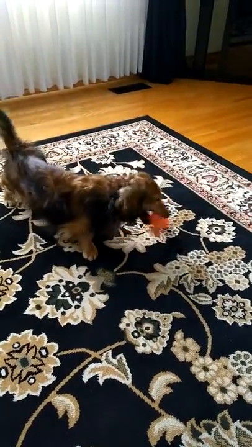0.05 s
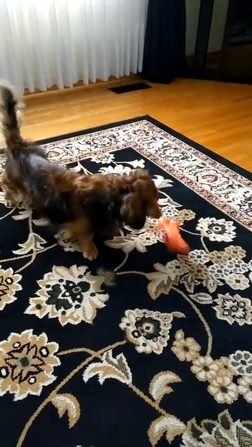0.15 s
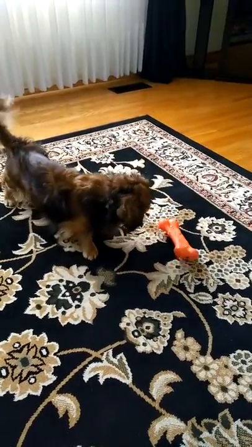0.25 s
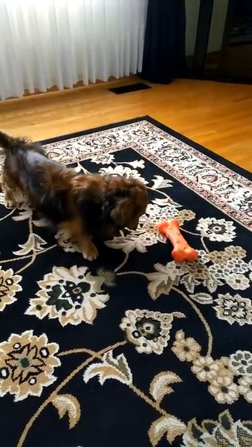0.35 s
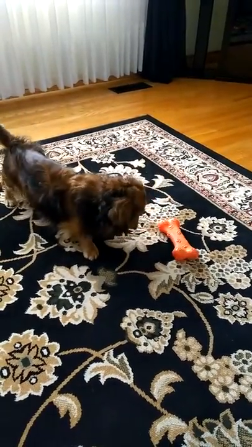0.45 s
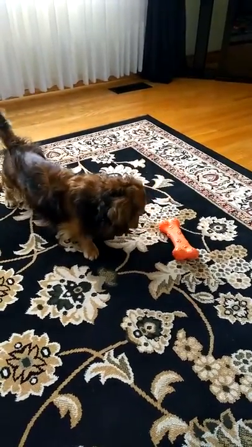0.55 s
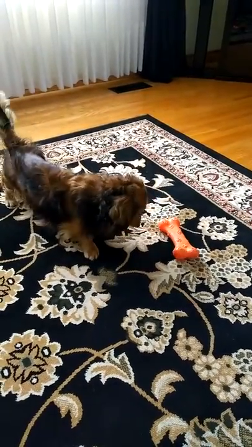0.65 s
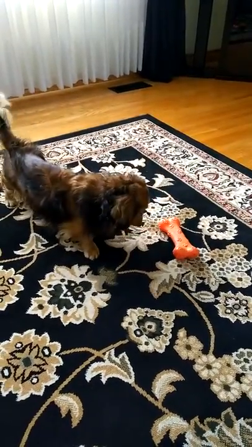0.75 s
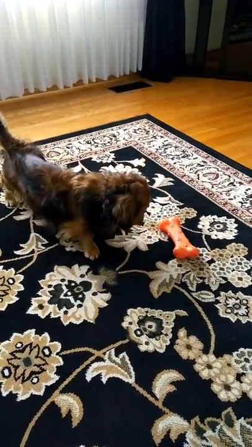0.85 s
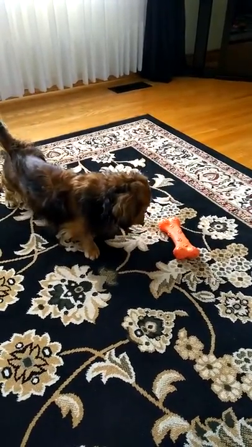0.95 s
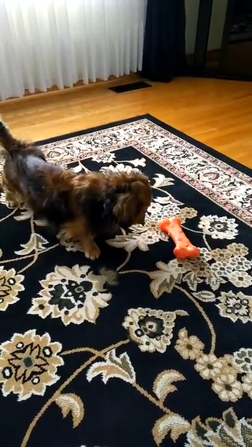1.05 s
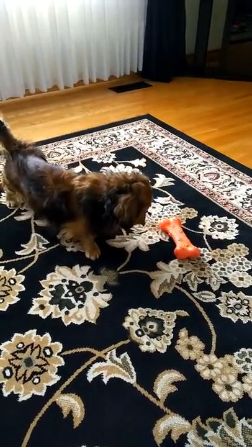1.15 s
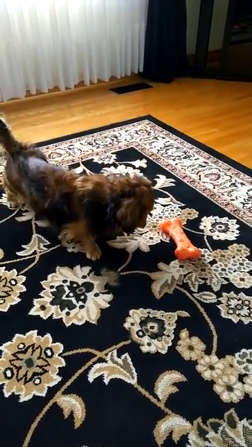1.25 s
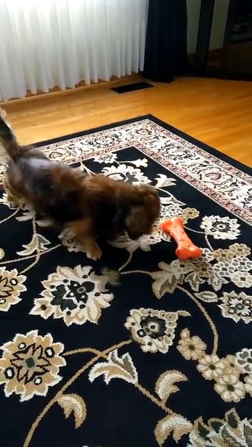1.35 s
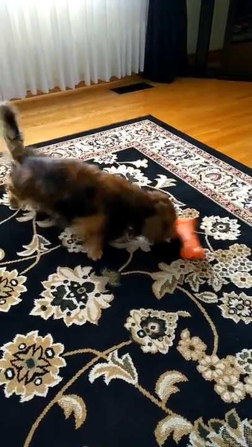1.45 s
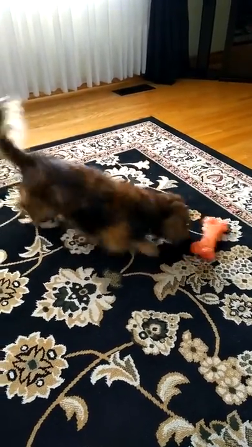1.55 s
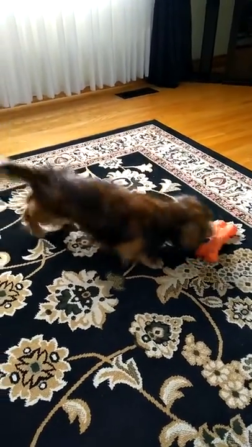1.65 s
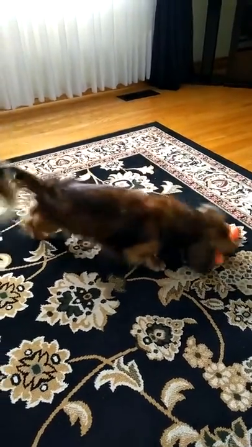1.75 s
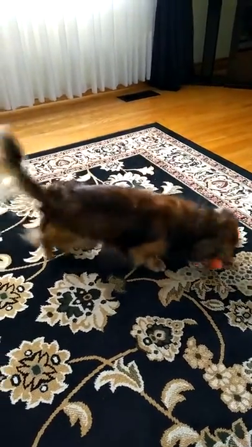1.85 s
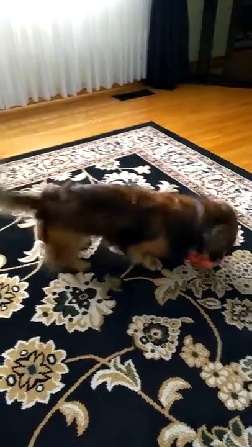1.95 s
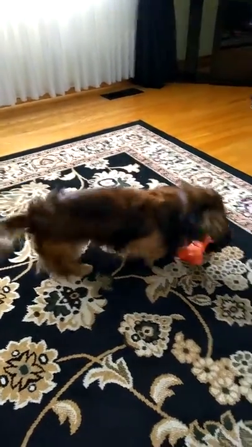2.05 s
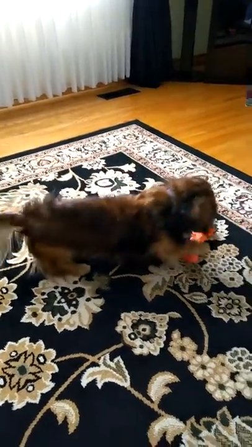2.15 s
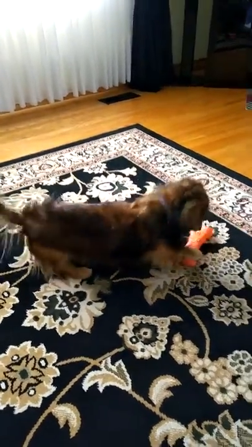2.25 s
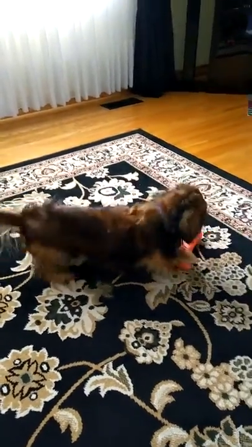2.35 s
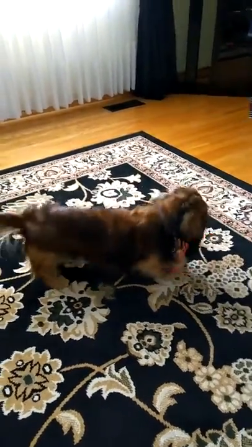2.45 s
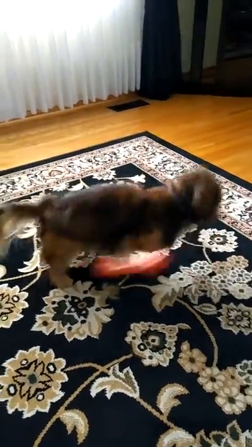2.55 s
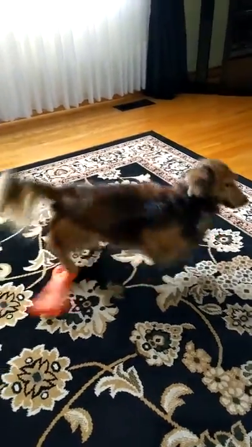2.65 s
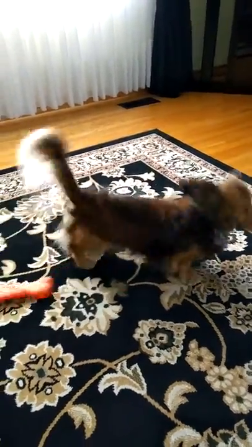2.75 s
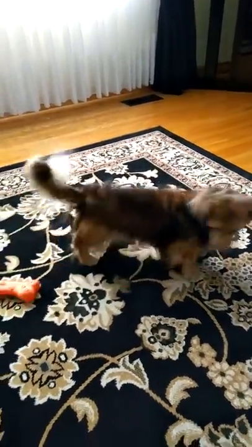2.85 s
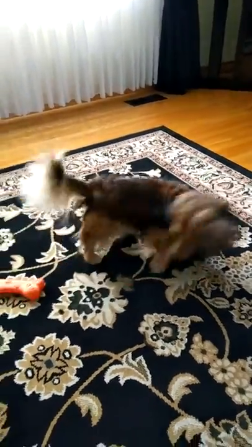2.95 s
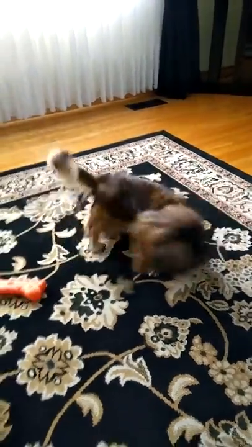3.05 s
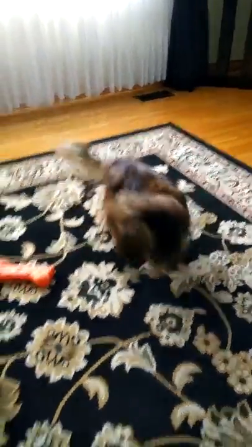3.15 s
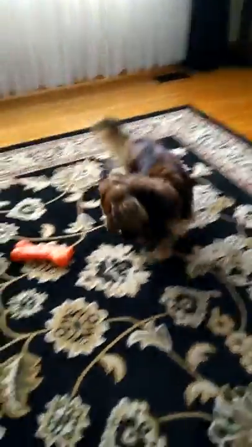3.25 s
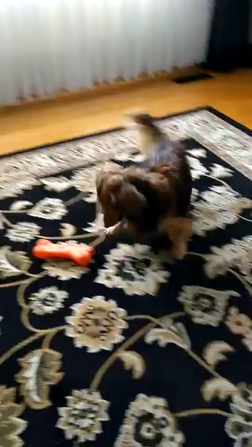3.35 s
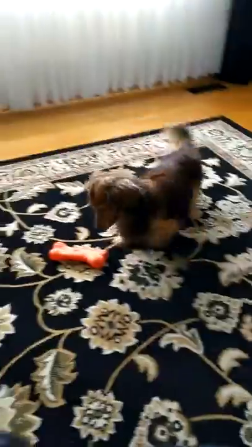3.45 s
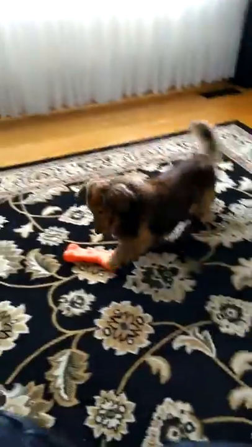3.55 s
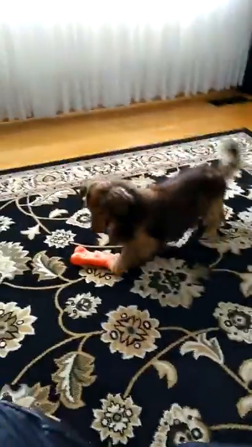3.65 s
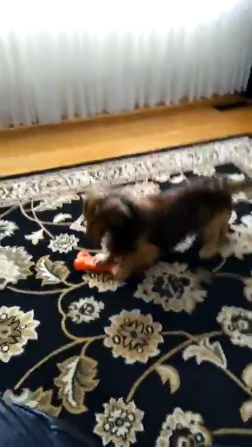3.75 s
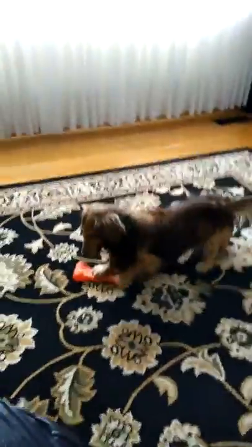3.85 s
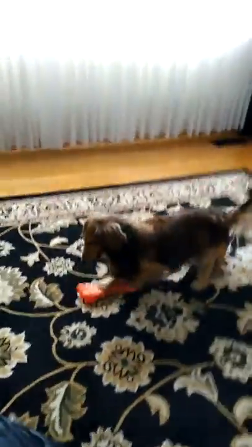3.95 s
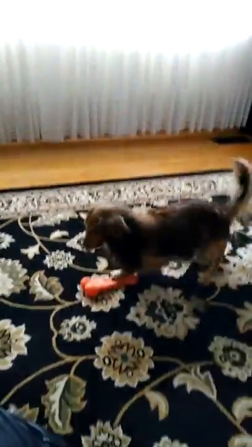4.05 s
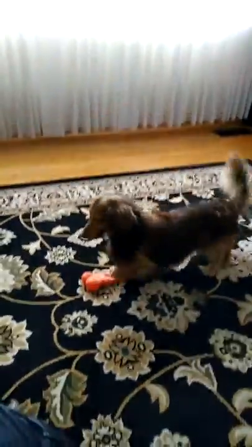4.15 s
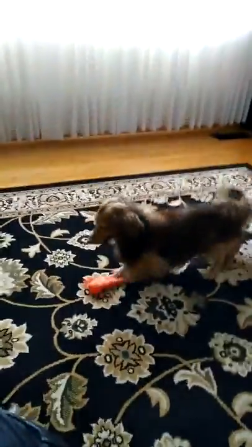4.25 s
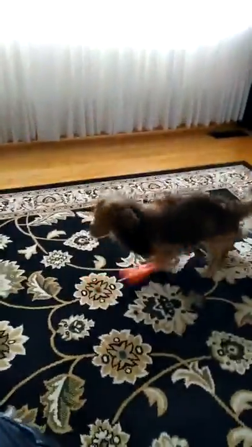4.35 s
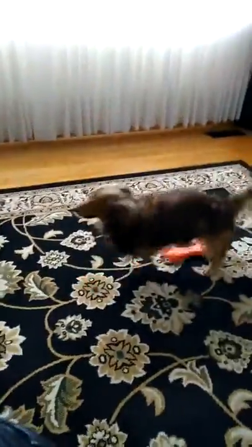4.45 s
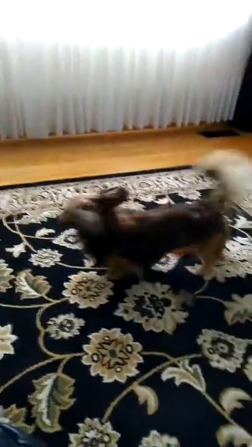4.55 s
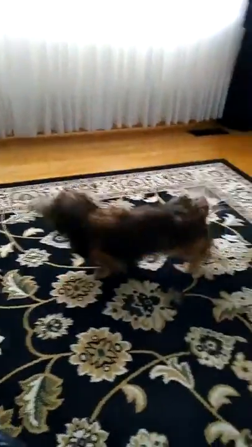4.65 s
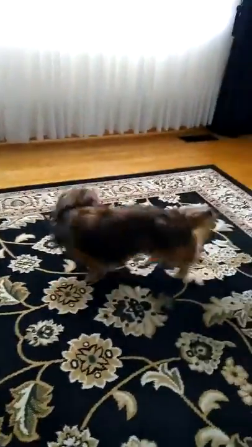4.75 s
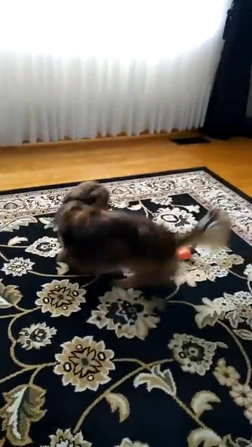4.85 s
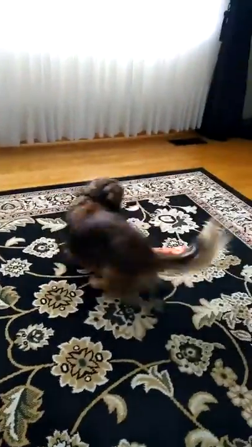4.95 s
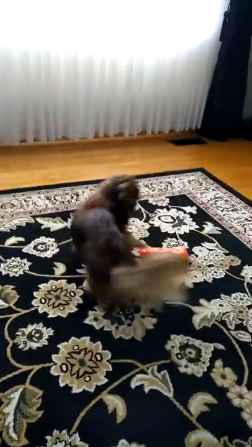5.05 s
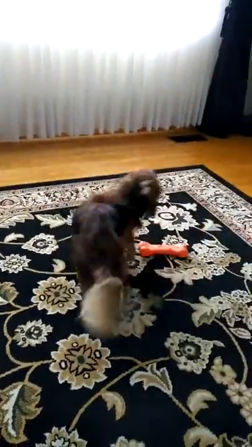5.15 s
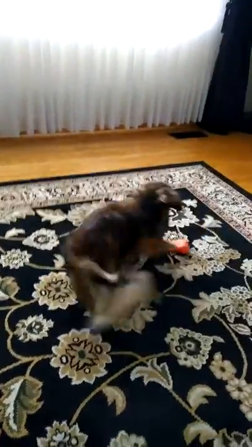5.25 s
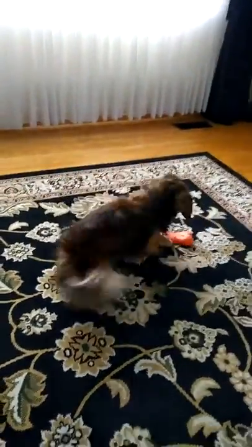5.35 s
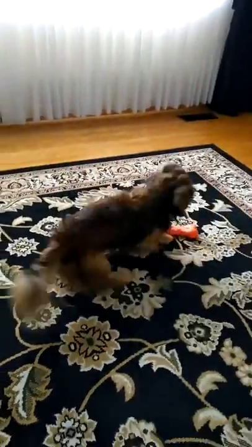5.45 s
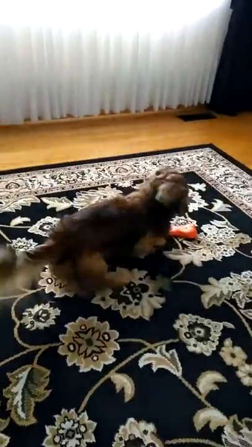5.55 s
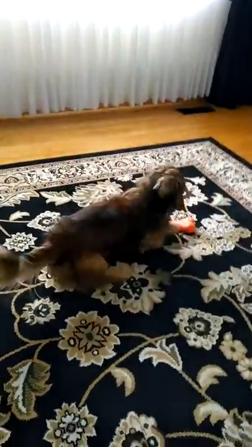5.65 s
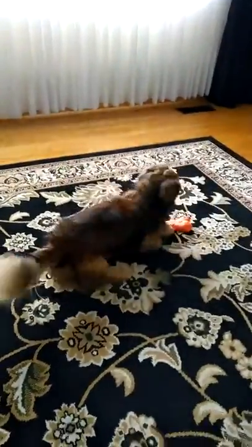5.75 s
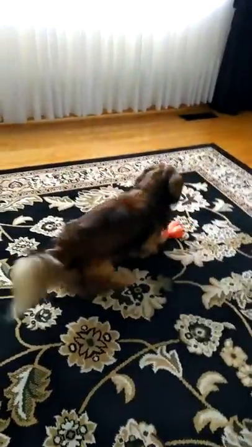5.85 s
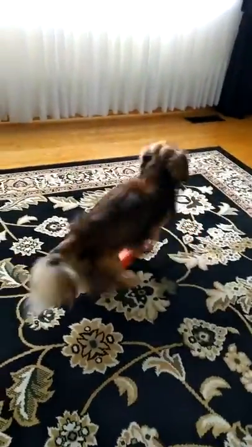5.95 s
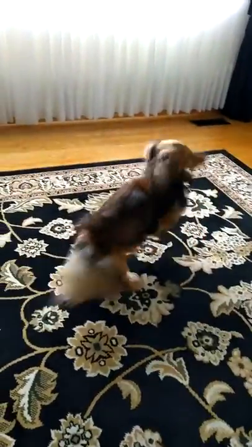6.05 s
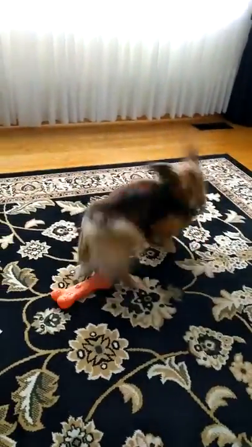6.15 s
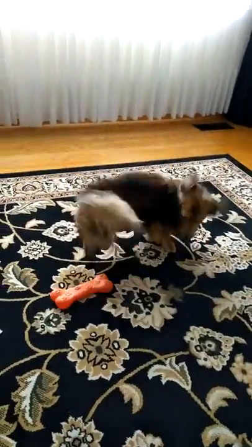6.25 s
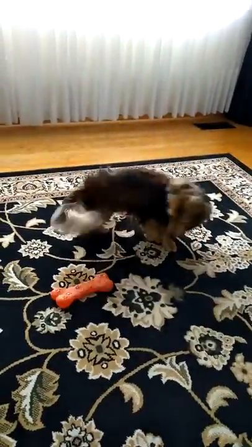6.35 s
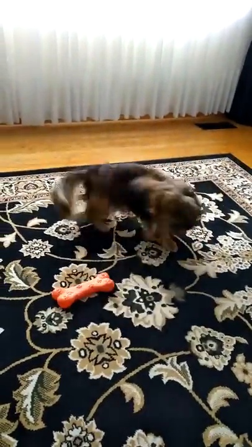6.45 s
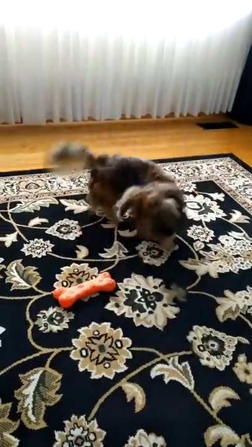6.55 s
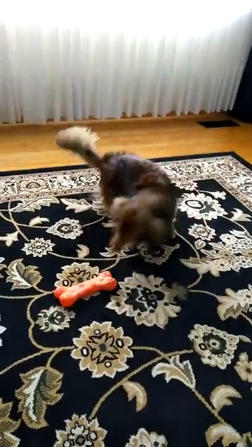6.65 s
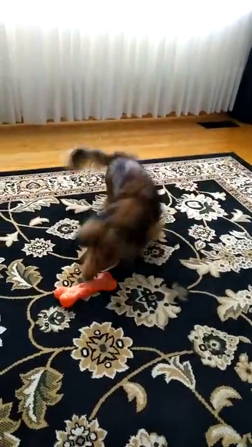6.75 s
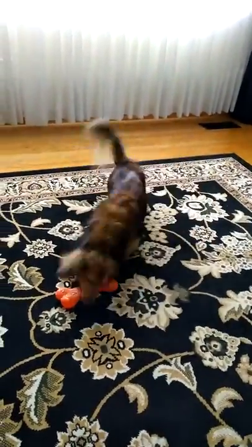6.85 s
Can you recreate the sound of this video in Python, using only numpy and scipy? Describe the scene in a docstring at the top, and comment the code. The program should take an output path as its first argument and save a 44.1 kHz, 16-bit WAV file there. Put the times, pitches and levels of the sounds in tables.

```python
"""A hollow rubber toy squeaks as a small dog bites and slams it on a rug over a wooden living-room floor.
Air driven through its reed makes a harmonic tone whose pitch sags with the pressure; refilling makes a hiss.
Landings of paws and toy excite damped board modes and a knock; teeth and claws click as short noise bursts.
A collar tag rings in high modes, fur and paws brush the rug as shaped noise, and the room adds its tail."""
import sys
import numpy as np
from scipy import signal
from scipy.fft import rfft, irfft
from scipy.io import wavfile

SR = 44100
rng = np.random.default_rng(int(sys.argv[2]) if len(sys.argv) > 2 else 0)


def put_to_file(sound):
    """Save the sound as 16-bit audio at rate SR, in the file named by the first command-line argument."""
    columns = np.atleast_2d(sound).T  # one column per channel
    safe = np.clip(columns, -1, 1)
    whole_steps = np.round(safe * 32767)
    wavfile.write(sys.argv[1], SR, whole_steps.astype(np.int16))


N = 303849
TIME = np.arange(N) / SR

# Bites on the toy: start t/s, build-up/s, time to empty/s, release t/s, top pitch f/Hz, sag/share,
# top level/dB (relative), start below top/dB, fade/dB, fundamental/dB, outer overtones/dB, air leak/dB
BITES = [ (0, 0.13, 0.25, .289, 1331, 0.097, -19, 4.5, 14, -17, 2.5, -59.5),
         (2.637, .002, .295, 2.925, 1350, 0.11, -20.5, 4, 12, -8.5, -2, -40.5),
         (4.457, .026, .43, 4.91, 1375, .108, -21.5, 4, 12, -7, -0.5, -39.5),
         (6.015, 0.019, 0.34, 6.39, 1354, 0.097, -21.5, 15.5, 10, -10, -2, -34.5)]
# Sudden blows on the toy: start t/s, time to empty/s, release t/s, pitch f/Hz, pitch drop/share,
# hold of the pitch (power), level/dB (relative), fade/dB, air leak/dB
BLOWS = [ (2.541, .049, 2.59, 1038, 0.38, 2.2, -22.5, 28, -8),
         (3.875, .081, 3.975, 998, .24, 3.4, -30, 9.5, -19)]
# Colour of the reed in its short plastic tube when squeezed: f/Hz, level/dB
SQUEEZED_REED = [(1000, -6.5), (1330, -5), (2000, -16), (2700, -23.5), (4000, -22.5), (5300, -21.5),
                 (6600, -16.5), (7300, 2.5), (8000, 3), (9300, 0.5), (10600, -10), (12500, -22.5),
                 (16000, -24.5)]
# Colour of the same reed when slammed: f/Hz, level/dB
SLAMMED_REED = [(750, -7.5), (1000, -12), (2000, -14.5), (3000, -20), (4000, -21), (5000, -11.5),
                (6000, -9.5), (7000, 2), (8000, 1), (9000, -4.5), (10500, -12.5), (13000, -23.5),
                (16000, -37)]
# Air drawn back through the silent reed: peak t/s, level/dB, rise/s, fall/s
REFILLS = [(.8, -67, .16, 0.24), (2.29, -66.5, 0.027, 0.16), (3.25, -60, 0.49, 0.48), (4.01, -66, .06, 0.8),
           (5.3, -70.5, 0.51, 0.203), (5.63, -60, 0.081, 0.12), (5.9, -64, 0.19, 0.27),
           (6.9, -66.5, 0.15, .2)]
# Colour of air rushing through the squeaker: f/Hz, relative density/dB per Hz
AIR_COLOUR = [(400, -30.5), (1500, -20), (3000, -16), (4500, -12), (5700, -12), (7300, -1), (8100, -3),
              (8900, -2), (10500, -11), (13000, -17), (16000, -25)]
# Landings of paws and toy at set times: t/s, level/dB (relative), knock relative to that/dB
LANDINGS = [(.281, -31.5, -20), (1.506, -56, 0.5), (1.678, -45, -23), (1.7894, -58, 9.5),
            (2.257, -50, -3.5), (2.498, -52, 6), (2.599, -50.5, 10), (3.128, -60, 8), (3.513, -47.5, -18),
            (3.823, -62, 16.5), (4.004, -62.5, 16), (4.052, -46.5, 4), (4.293, -51, 2.5), (4.389, -57, 9),
            (4.436, -55, 10), (4.628, -47.5, -26), (5.213, -40, -13), (5.276, -55.5, 3), (5.355, -58.5, 6),
            (5.568, -54.5, 10.5), (5.96, -59, 11), (6.0, -64, 15), (6.113, -47.5, -3), (6.43, -48.5, -29),
            (6.819, -55, -22)]
# Modes of the floorboards under the rug: f/Hz (before detuning), level/dB (mean), t60/s
BOARD_MODES = [(62, -14.5, 0.33), (91, -4, 0.084), (117, 0.5, 0.11), (144.3, -2, 0.26), (171, -7.5, 0.11),
               (215.7, -8, 0.17), (255, -29, 0.028)]
# Colour of the knock's rattle: f/Hz, relative density/dB per Hz
KNOCK_COLOUR = [(40, -49), (150, -10.5), (300, 11), (450, -3), (700, -5), (1300, -19.5), (3000, -22),
                (15000, -61)]
# Teeth and claws on the rubber: t/s, level/dB (relative)
CLICK_TIMES = [(2.257, -40), (2.4959, -35.5), (2.6325, -35), (3.8192, -34.5), (3.835, -35), (4.051, -39.5),
               (4.074, -37), (4.182, -42.5), (4.252, -40), (4.297, -39), (4.438, -35), (5.26, -40),
               (5.351, -34), (5.36, -40), (5.517, -44.5), (5.571, -37.5), (5.601, -38.5), (5.737, -39),
               (5.922, -44), (6.322, -41)]
# Colour of a click: f/Hz, relative density/dB per Hz
CLICK_COLOUR = [(400, -7.5), (1500, 1.5), (3000, -2.5), (5000, -0.5), (8500, 5.5), (11000, -3),
                (16000, -18.5)]
# Collar tag touching its ring: t/s, level/dB (relative)
TAG_TOUCHES = [(2.0084, -46.5), (2.054, -57), (2.064, -46), (2.145, -53), (5.095, -46), (5.62, -40.5)]
# Modes of the tag: f/Hz (before detuning), level/dB (mean), t60/s
TAG_MODES = [(6430, -16.5, 0.035), (7350, 5, 0.14), (8600, -3.5, 0.067), (10200, 6, 0.054),
             (10970, -1, 0.06), (12350, -5, .035), (13800, -5, 0.044)]
# Lunges and turns brushing the rug: peak t/s, level/dB, rise/s, fall/s
SHUFFLES = [(1.66, -70, 0.067, 0.073), (1.95, -74.5, 0.1, 0.22), (2.6, -59, .1, 0.2),
            (3.38, -66, 0.46, 0.49), (4.43, -65.5, 0.34, 0.33), (5.35, -65.5, 0.12, 0.4),
            (6.0, -57.5, .08, 0.12)]
# Colour of rubbing on the rug: f/Hz, relative density/dB per Hz
RUG_COLOUR = [(25, -35), (60, -5), (110, -3.5), (350, -5), (550, -11.5), (2000, -19), (6000, -23.5),
              (9000, -39.5), (16000, -64)]
# Colour of the still room: f/Hz, relative density/dB per Hz
STILL_ROOM_COLOUR = [(15, -31.5), (30, -18), (45, -8), (60, -0.5), (85, -13), (145, -15), (360, -22.5),
                     (560, -24.5), (890, -26.5), (1500, -29.5), (2500, -30.5), (9000, -31.5),
                     (16000, -33.5)]
# Reverberation time of the room: f/Hz, t60/s
ROOM_T60 = [(100, 0.59), (400, 0.52), (1200, 0.62), (3000, 0.55), (8000, 0.41), (15000, 0.19)]
# First echoes off floor, furniture, window and ceiling: delay/s, level/dB (before its drift)
ECHOES = [(.0047, -16), (.0093, -10.5), (0.014, -9), (0.0218, -14)]

# pressure falls steadily, then collapses: further loss of pitch and level, and how abruptly
COLLAPSE_SHARE, COLLAPSE_DB, COLLAPSE_POWER = .11, 10, 6.5
RISE_HZ_PER_S = 200  # while the jaws are still closing
SLACK_POWER = 3.2  # how late in a bite the reed goes slack
BLOW_SLACK = 1  # slackness at the end of a blow
BLOW_FUNDAMENTAL_DB, BLOW_BUZZ_DB = 4.5, 1.45
EMPTY_DB_PER_S = 600  # extra decay once a blow has emptied the toy
STEPS_FROM_S, STEPS_PER_S = 2.5, 4
STEP_DB, STEP_SPREAD_DB, STEP_KNOCK_DB = -55, 4, -12
FIDGET_DB = -79.5  # constant brushing beneath the moves
STILL_ROOM_DB = -65.5
MIC_LOW_CUT_HZ, CUTOFF_HZ = 55, 15900


def from_db(db):
    """A level in decibels is twenty times the logarithm of an amplitude ratio."""
    return 10 ** (np.asarray(db) / 20)


def rms_one(x):
    """Dividing by the root mean square gives unit effective amplitude."""
    return x / np.sqrt(np.mean(x ** 2) + 1e-20)


def at_hz(points, hz):
    """A curve over frequency is interpolated on a logarithmic frequency axis."""
    known_hz, values = np.transpose(points)
    return np.interp(np.log(np.maximum(hz, 1)), np.log(known_hz), values)


def noise(spectrum, size=N):
    """Filtering white noise by a spectral envelope gives coloured noise, here of rms 1."""
    hz = np.fft.rfftfreq(size, 1 / SR)
    white = rfft(rng.standard_normal(size))
    return rms_one(irfft(white * from_db(at_hz(spectrum, hz)), size))


def drift(per_s):
    """Joining random values, per_s of them a second, gives a slow fluctuation of rms 1."""
    knots = rng.standard_normal(N // 8)
    return rms_one(np.interp(TIME * per_s, np.arange(len(knots)), knots))


def swells(rows):
    """Each gain envelope is a Gaussian with separate time constants for rise and fall."""
    gain = 0
    for s, level_db, rise_s, fall_s in rows:
        width_s = np.where(TIME < s, rise_s, fall_s)
        gain = gain + from_db(level_db) * np.exp(-((TIME - s) / width_s) ** 2)
    return gain


def add(track, s, sound):
    """Sounds superpose linearly; this one starts at time s."""
    start = max(0, round(s * SR))
    track[start:start + len(sound)] += sound[:N - start]


def burst(spectrum, rise_s, t60, size=16384):
    """Densely packed modes sound as noise that swells quickly and decays exponentially."""
    t = np.arange(size) / SR
    return noise(spectrum, size=size) * (1 - np.exp(-t / rise_s)) * from_db(-60 * t / t60)


def ring(modes, spread_db, detune, size=16384):
    """Modal excitation: each touch gives every damped mode a chance strength and shift in pitch."""
    t = np.arange(size) / SR
    hz, mode_db, t60 = np.transpose(modes)[:, :, None]
    strength_db = mode_db + spread_db * rng.standard_normal(hz.shape)
    hz = hz * (1 + detune * rng.uniform(-0.82, 1, hz.shape))
    partials = from_db(strength_db - 60 * t / t60) * np.sin(2 * np.pi * hz * t)
    return np.sum(partials, axis=0)


def reed(pitch, level_db, slack, colour, fundamental_db, buzz_db, air_db, jitter,
         waver=0.0012, mellow_db=9, slack_waver=0.0095, leak_db=13, slack_jitter=.004, dull_db=4):
    """A reed chops air into harmonic pulses; slackness (0-1) adds waver and leak and dulls the overtones."""
    size = len(pitch)
    t = np.arange(size) / SR
    fast = (jitter + slack_jitter * slack) * drift(900)[:size]
    slow = (waver + slack_waver * slack) * drift(150)[:size]
    hz = pitch * (1 + fast + slow)
    phase = 2 * np.pi * np.cumsum(hz) / SR
    orders = np.arange(1, 21)[:, None]
    outer = (orders > 1) & ((orders < 5) | (orders > 7))  # all overtones but the 5th to 7th
    partial_db = at_hz(colour, orders * hz) + fundamental_db * (orders == 1) + buzz_db * outer
    partial_db = partial_db + slack ** 2 * (mellow_db / orders - dull_db * orders / 10)
    audible = orders * hz < SR / 2
    tone = np.sum(from_db(partial_db) * audible * np.cos(orders * phase), axis=0)
    # turbulence escapes each time the reed opens
    opening = 1 + np.cos(phase)
    air = from_db(air_db + leak_db * slack) * noise(AIR_COLOUR, size=32768)[:size] * opening
    gate = np.clip(t / 0.00047, 0, 1) * np.clip((t[-1] - t) / 0.0014, 0, 1)
    return (tone + air) * from_db(level_db) * gate


def bites(tremble=0.0064):
    """Reed pitch and level follow pressure as it builds, sags and collapses, with growing unsteadiness."""
    out = np.zeros(N)
    for (s, build_s, empty_s, release_s, top_hz, sag, top_db, start_db, fade_db,
         fundamental_db, buzz_db, air_db) in BITES:
        t = np.arange(round((release_s - s) * SR)) / SR
        closing_s = np.maximum(build_s - t, 0)
        spent = np.clip((t - build_s) / empty_s, 0, 1)
        collapse = spent ** COLLAPSE_POWER
        unsteady = tremble * spent * drift(45)[:len(t)]
        pitch = top_hz * (1 - sag * spent - COLLAPSE_SHARE * collapse + unsteady)
        pitch = pitch - RISE_HZ_PER_S * closing_s
        level_db = top_db - start_db * closing_s / build_s - fade_db * spent - COLLAPSE_DB * collapse
        add(out, s, reed(pitch, level_db, spent ** SLACK_POWER, SQUEEZED_REED,
                         fundamental_db, buzz_db, air_db, jitter=0.00087))
    return out


def first_echoes(x, moving_db=2.5):
    """Early reflection: surfaces return delayed copies, whose share drifts as the dog swings the toy."""
    out = x.copy()
    for delay_s, echo_db in ECHOES:
        delayed = np.interp(TIME - delay_s, TIME, x, left=0)
        out += delayed * from_db(echo_db + moving_db * drift(25))
    return out


def room(x, wet_db, build_s=0.0059):
    """Diffuse reverberation: convolution with noise that decays at its own rate in each band."""
    t = np.arange(SR) / SR
    edges = np.geomspace(50, 18000, 13)  # Hz
    tail = 0
    for low, high in zip(edges, edges[1:]):
        band_filter = signal.butter(2, [low, high], "band", fs=SR, output="sos")
        band = signal.sosfilt(band_filter, rng.standard_normal(SR))
        tail = tail + band * from_db(-60 * t / at_hz(ROOM_T60, np.sqrt(low * high)))
    tail = rms_one(tail * (1 - np.exp(-(t / build_s) ** 2))) / np.sqrt(SR)  # unit energy
    return from_db(wet_db) * signal.fftconvolve(x, tail)[:N]


def scuffing(uneven_db=3.0):
    """Friction on the rug's pile gives coloured noise of uneven strength."""
    gain = from_db(FIDGET_DB) + swells(SHUFFLES)
    return gain * noise(RUG_COLOUR) * from_db(uneven_db * drift(35))


def still_room():
    """A steady background is stationary coloured noise."""
    return from_db(STILL_ROOM_DB) * noise(STILL_ROOM_COLOUR)


def dropped_toy(hz=1005, level_db=-54, t60=0.22):
    """A damped resonance: the hollow toy pings at the first landing, as it falls from the dog's mouth."""
    t = np.maximum(TIME - LANDINGS[0][0], 0)
    envelope = from_db(level_db - 60 * t / t60) * (1 - np.exp(-t / 0.0008))
    return envelope * np.sin(2 * np.pi * hz * t)


def thuds(cushion_s=0.0037, boom_db=-1, push_s=0.00049, push_db=-1, rattle_db=-1.0):
    """Impact excites board modes through the soft rug, with a knock made of one short push and a rattle."""
    out = np.zeros(N)
    for s, level_db, knock_db in list(LANDINGS) + light_steps():
        boom = from_db(boom_db) * ring(BOARD_MODES, spread_db=2, detune=0.12)
        t = np.arange(len(boom)) / SR
        boom = boom * (1 - np.exp(-t / cushion_s))
        push = t / push_s * (2 - t / push_s) * np.exp(1 - t / push_s)
        rattle = burst(KNOCK_COLOUR, rise_s=0.0012, t60=0.081)
        knock = from_db(push_db) * push + from_db(rattle_db) * rattle
        add(out, s, from_db(level_db) * (boom + from_db(knock_db) * knock))
    return out


def refill(flutter_db=1.5):
    """Elastic recovery: the rubber springs back and draws a thin turbulent hiss through the squeaker."""
    return swells(REFILLS) * noise(AIR_COLOUR) * from_db(flutter_db * drift(27))


def collar_tag(gain_db=-16, tick_db=-2):
    """Each contact gives a broadband tick and sets the tag's damped modes ringing."""
    out = np.zeros(N)
    for s, touch_db in TAG_TOUCHES:
        add(out, s, from_db(touch_db + gain_db) * ring(TAG_MODES, spread_db=3.5, detune=0.0044))
        # the tick borrows the colour of the air
        add(out, s, from_db(touch_db + tick_db) * burst(AIR_COLOUR, rise_s=.0001, t60=0.01, size=4096))
    return out


def clicks(gain_db=-1):
    """Heavily damped contact: teeth and claws give short dry bursts of noise."""
    out = np.zeros(N)
    for s, click_db in CLICK_TIMES:
        snap = burst(CLICK_COLOUR, rise_s=.0001, t60=0.0069, size=4096)
        add(out, s, from_db(click_db + gain_db) * snap)
    return out


def light_steps(count=24):
    """Chance shifts in time and level make a regular pace an uneven patter, as rows like LANDINGS."""
    chance = rng.standard_normal((count, 2))
    times = STEPS_FROM_S + (np.arange(count) + 0.77 * chance[:, 0]) / STEPS_PER_S
    return [(s, STEP_DB + STEP_SPREAD_DB * weight, STEP_KNOCK_DB)
            for s, weight in zip(times, chance[:, 1]) if s < TIME[-1]]


def blows():
    """Sudden loss of pressure: a slam gives a low, rough chirp whose pitch holds briefly and plunges."""
    out = np.zeros(N)
    for s, empty_s, release_s, top_hz, drop, power, top_db, fade_db, air_db in BLOWS:
        t = np.arange(round((release_s - s) * SR)) / SR
        collapse = np.minimum(t / empty_s, 1) ** power
        pitch = top_hz * (1 - drop * collapse)
        level_db = top_db - fade_db * collapse - EMPTY_DB_PER_S * np.maximum(t - empty_s, 0)
        add(out, s, reed(pitch, level_db, BLOW_SLACK * collapse, SLAMMED_REED,
                         BLOW_FUNDAMENTAL_DB, BLOW_BUZZ_DB, air_db, jitter=0.0019))
    return out


def scene():
    """Superposition: squeaks and contacts with their reverberation, over soft noises left dry."""
    squeaks = from_db(-3.0) * bites() + from_db(-4.0) * blows()
    toy = first_echoes(squeaks) + room(squeaks, wet_db=-4.5)
    soft = refill() + scuffing() + still_room()
    contacts = dropped_toy() + clicks() + collar_tag() + thuds()
    dog = contacts + room(contacts, wet_db=-3)
    return (toy + dog + soft)[None]


def record(dry):
    """Band limitation: the small microphone loses the deepest bass, and the top is cut steeply."""
    low_cut = signal.butter(2, MIC_LOW_CUT_HZ, "high", fs=SR, output="sos")
    top_cut = signal.ellip(12, .2, 80, CUTOFF_HZ, fs=SR, output="sos")
    return signal.sosfilt(top_cut, signal.sosfilt(low_cut, dry))


dry = scene()
out = record(dry)
put_to_file(out)
```